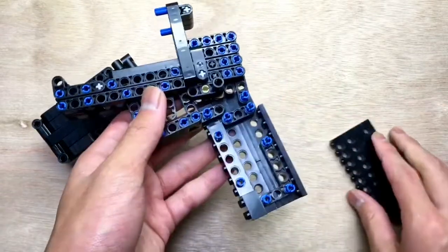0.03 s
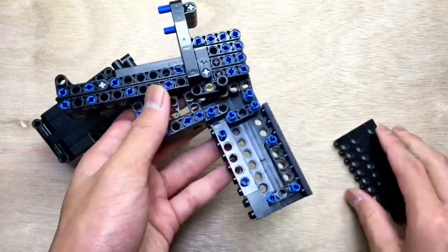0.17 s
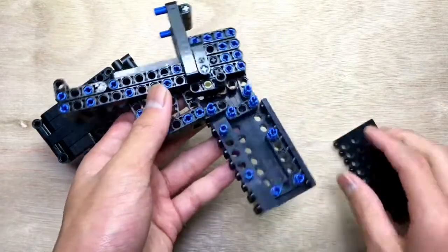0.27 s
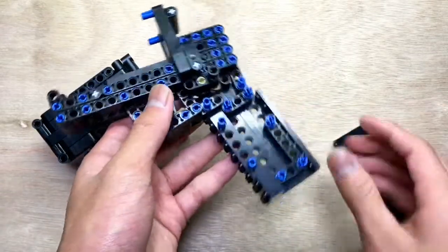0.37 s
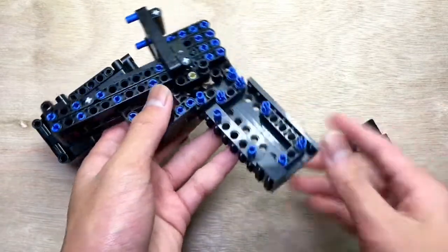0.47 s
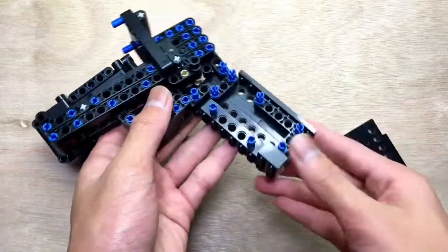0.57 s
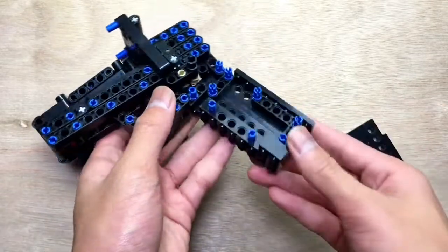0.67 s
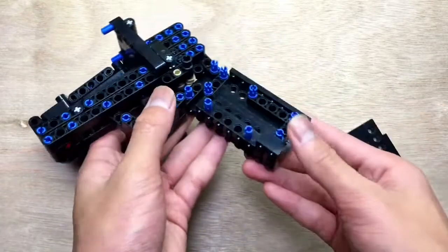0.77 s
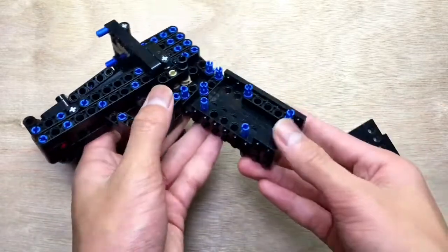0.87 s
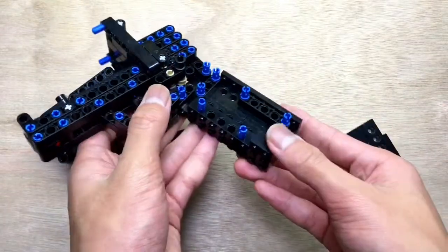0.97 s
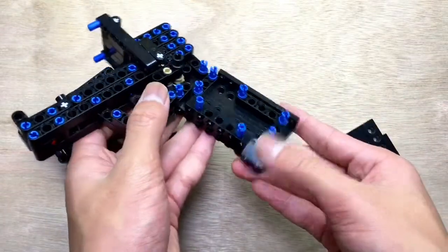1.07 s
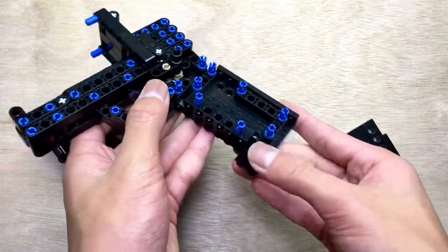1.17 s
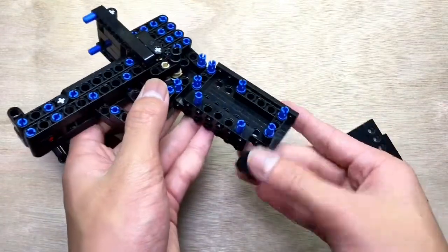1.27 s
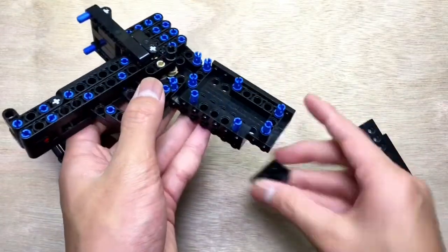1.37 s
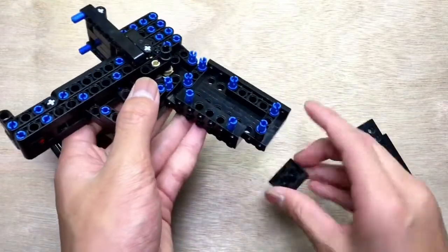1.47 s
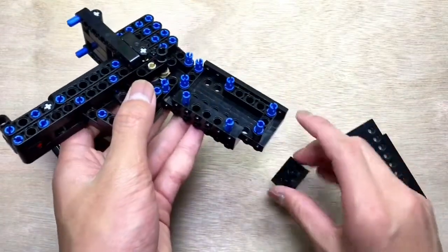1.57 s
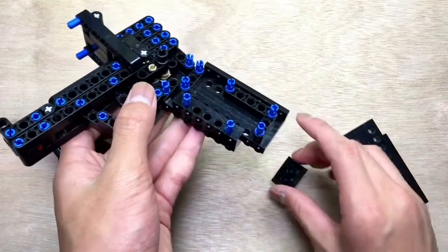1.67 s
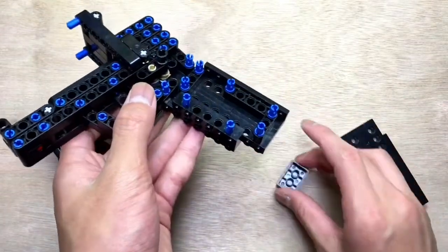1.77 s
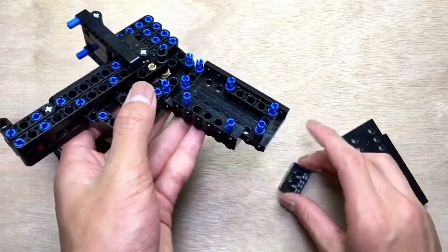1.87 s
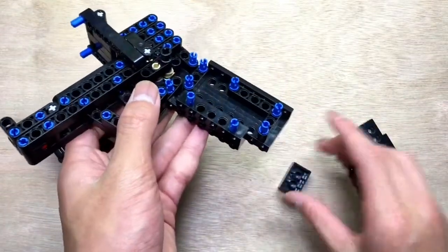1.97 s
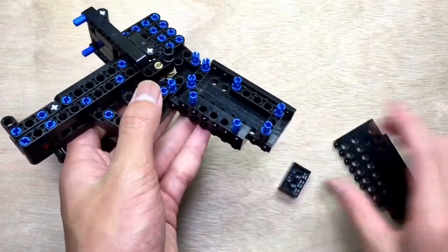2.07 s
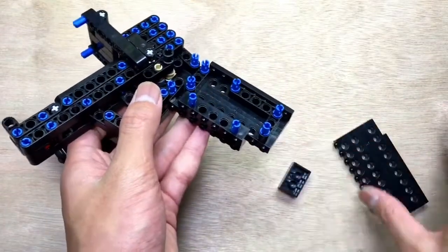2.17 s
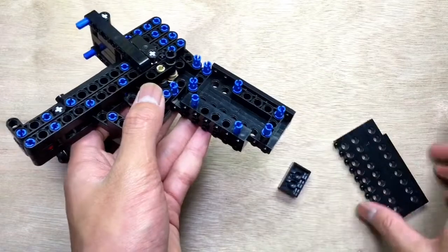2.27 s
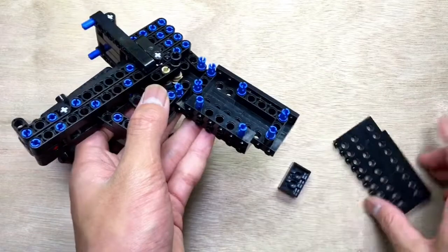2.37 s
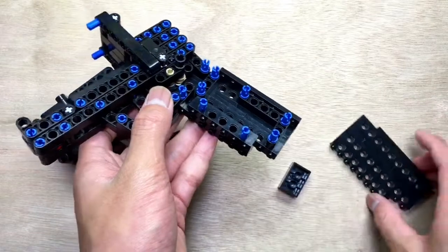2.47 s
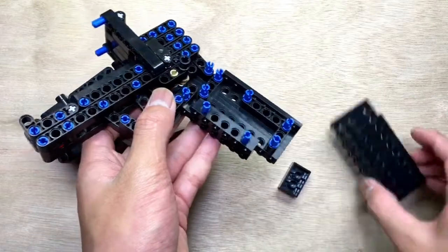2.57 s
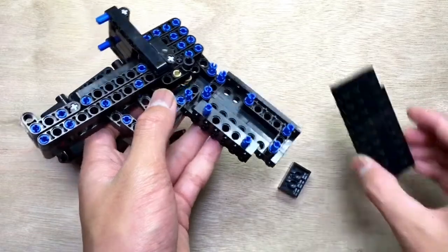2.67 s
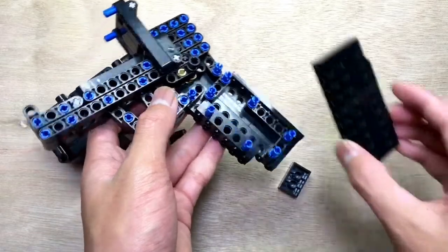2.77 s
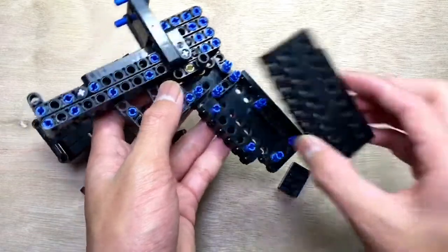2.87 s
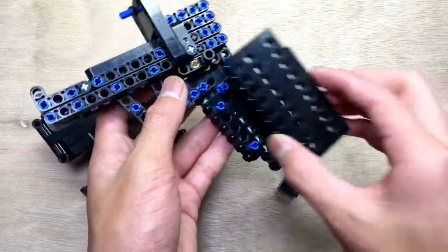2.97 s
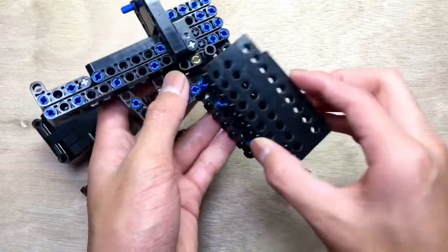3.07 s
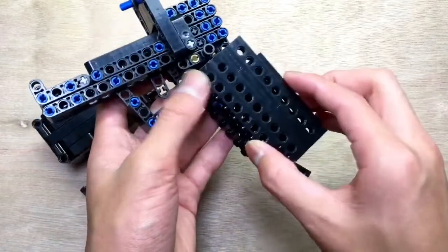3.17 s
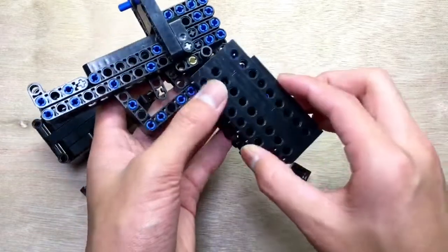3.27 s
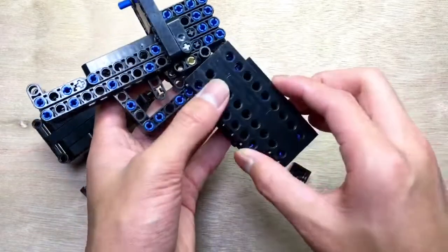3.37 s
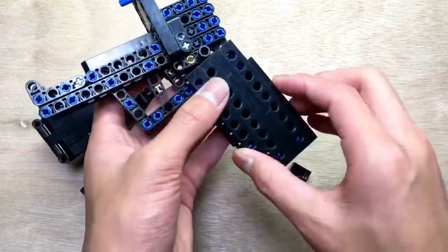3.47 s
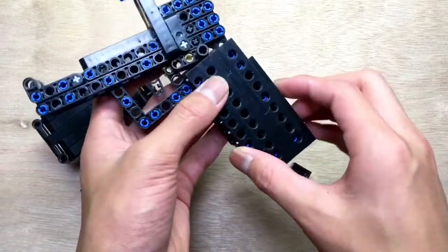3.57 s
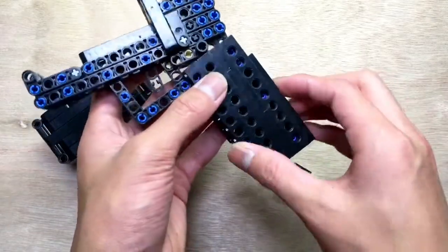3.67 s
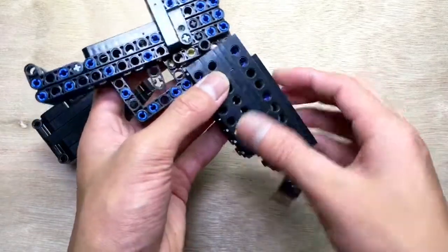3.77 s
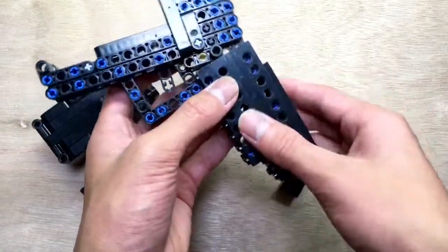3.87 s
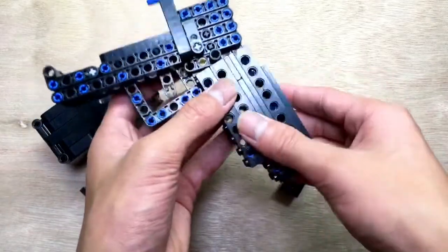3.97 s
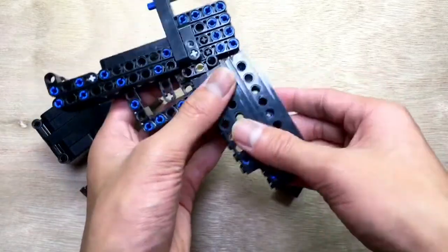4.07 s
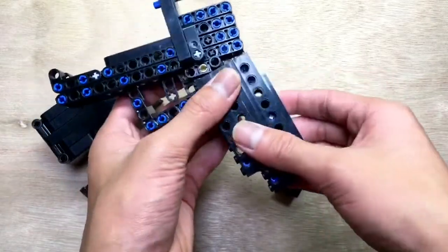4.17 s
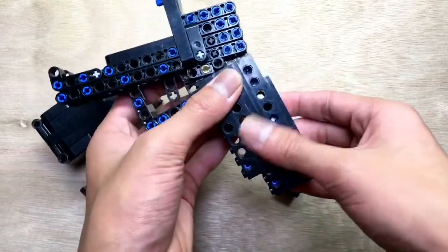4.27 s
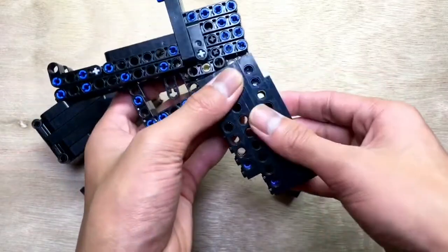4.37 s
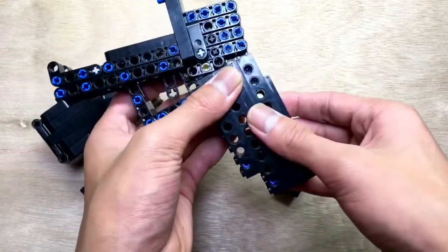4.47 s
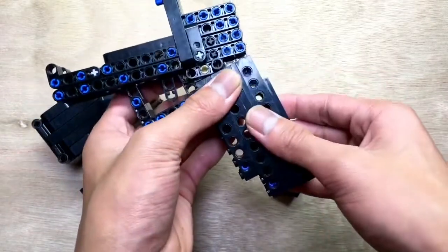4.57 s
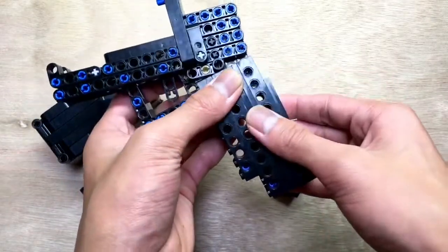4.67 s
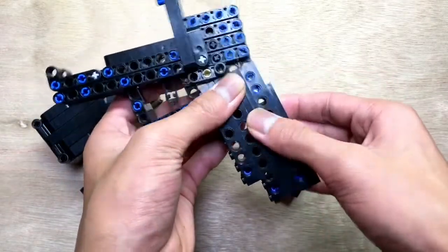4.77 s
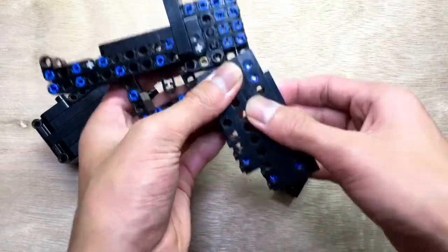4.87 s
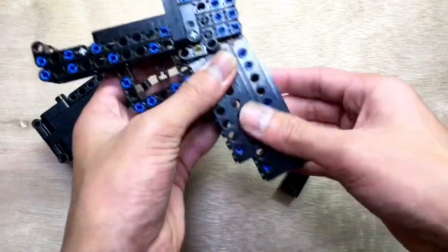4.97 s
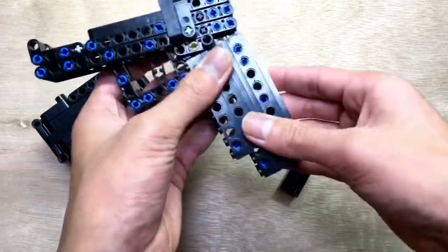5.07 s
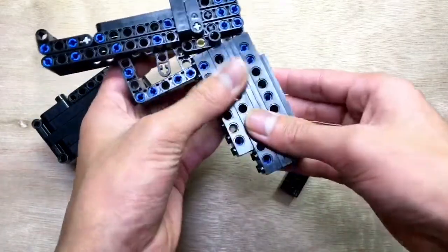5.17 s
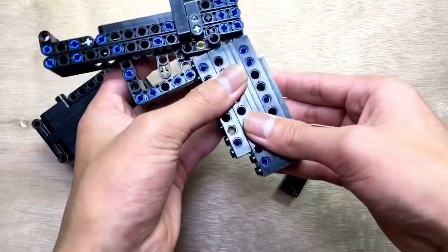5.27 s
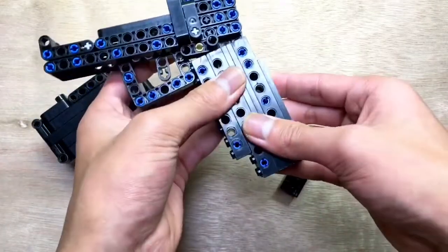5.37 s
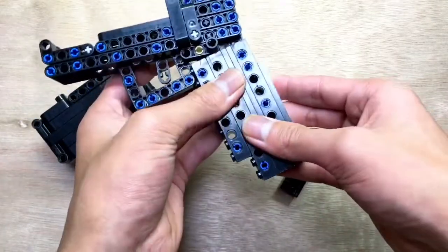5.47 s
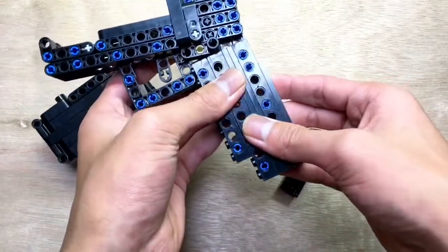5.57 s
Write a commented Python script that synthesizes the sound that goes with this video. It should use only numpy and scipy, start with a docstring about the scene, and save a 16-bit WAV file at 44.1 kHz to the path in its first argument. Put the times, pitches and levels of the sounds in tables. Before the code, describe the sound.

Very close microphone in a small, fairly dry room. A plastic part knocks dully on a wooden table, then a long pause, a faint tick, a brighter tap with small rattles and a short scrape. Later a plate is pressed onto pins, with one clear clack, light ticks and a run of sharp, loud snaps to the end. A faint wavering hum and hiss lie beneath.

```python
"""Plastic building parts snapped together

Plastic beams and pins are handled close to a microphone over a wooden table: decaying modes driven by chatter.
Loose parts are tapped and slid on the wood; then a plate is pressed onto pins, which tick and snap home.
A small room answers with bursts of diffuse noise after clicks and sparse echoes of the tabletop sounds.
Beneath lie a low wavering hum of sines and a hiss of shaped noise."""
import sys
import numpy as np
from scipy import signal
from scipy.io import wavfile
from scipy.ndimage import uniform_filter1d

SR = 44100
rng = np.random.default_rng(int(sys.argv[2]) if len(sys.argv) > 2 else 0)


def file_out(sig):
    """Save sig as 16-bit WAV at sys.argv[1]."""
    # one column per channel
    cols = np.atleast_2d(sig).T
    # limit, then scale
    lim = np.clip(cols, -1, 1)
    pcm = np.round(lim * 32767).astype(np.int16)
    wavfile.write(sys.argv[1], SR, pcm)


N = 247842

# Modes of a loose part lying on the wood. Each row: frequency in Hz, relative level in dB,
# t60 in ms (ring() raises any below 1 ms to 1 ms).
PART_MODES = [(364, 5, 9.7), (715, 0, 16.3), (850, 1, 24), (956, 2.5, 26.4), (1457, 1, 10.2),
              (1644, -0.5, 26), (1783, -4, 50), (1877, -9.5, 120), (2310, 3.5, 6.3), (2696, -7.5, 31),
              (2870, -0.5, 19), (3390, 0.5, 27), (4000, -12.5, 10), (4075, -8, 47), (4550, -4.5, 27),
              (4760, -12, 0.9), (6370, 8, 3), (8900, -32, 0.89), (13000, 4.5, 0.84)]
# Modes of the wooden table top. Each row: frequency in Hz, relative level in dB, t60 in ms.
TABLE_MODES = [(59.6, -14, 164), (92.3, -3, 72), (135, -6, 93), (193.3, -0.5, 58), (258.4, 3, 28.3),
               (340, 8.5, 12.6)]


def amp(db):
    """Amplitude factor for a level in dB."""
    return 10 ** (np.asarray(db) / 20)


def evened(x):
    """Scale to an rms of 1."""
    return x / np.sqrt(np.mean(x ** 2) + 1e-20)


def peaked(x, db):
    """Scale so that the highest peak stands at this level."""
    return amp(db) * x / abs(x).max()


def read(points, hz):
    """Interpolate a curve of (Hz, value) points over log frequency."""
    point_hz, value = np.transpose(points)
    return np.interp(np.log(hz + 1), np.log(point_hz + 1), value)


def add(mix, start_s, sound):
    """Lay a sound into the mix, cut off at the end."""
    part = mix[round(start_s * SR):][:len(sound)]
    part += sound[:len(part)]


def band(x, lo_hz, hi_hz):
    """Band-pass between two frequencies."""
    sos = signal.butter(2, [lo_hz, hi_hz], "bandpass", fs=SR, output="sos")
    return signal.sosfilt(sos, x)


def ring(modes, spread_db=0., detune=0., size=8192):
    """Impulse response of dying modes of alternate sign; the place of contact changes their shares a little."""
    hz, db, t60_ms = np.transpose(modes)[:, :, None]
    pitch_chance, level_chance = rng.standard_normal((2, len(modes), 1))
    t = np.arange(size) / SR
    turns = hz * (1 + detune * pitch_chance) * t
    decay = amp(db + spread_db * level_chance - 60 * 1000 * t / np.maximum(t60_ms, 1))
    sign = (-1) ** np.arange(len(modes))[:, None]
    return (sign * decay * np.sin(2 * np.pi * turns)).sum(0)


def chatter(hold_ms, t60_ms, rise_ms=0.52, uneven_db=3):
    """Uneven micro-impacts: they build up, hold while the parts jam, then die away."""
    ms = np.arange(8192) * 1000 / SR
    grit = rng.standard_normal(len(ms)) * amp(uneven_db * rng.standard_normal(len(ms)))
    rise = np.minimum(ms / rise_ms, 1)
    fall = amp(-60 * np.maximum(ms - hold_ms, 0) / t60_ms)
    return grit * rise * fall


def click(level_db, bright_db, plate_db, t60_ms):
    """Each group of parts chatters and rings, the small ones more in a bright click; diffuse echoes follow."""
    # Heavily damped modes of the held assembly, one group each for plate, beams, pins and edges.
    # Each row of a group: frequency in Hz, relative level in dB, t60 in ms.
    assembly = [
        [(600, -14, 4), (1050, 0, 6), (1420, 0, 5), (1750, 0, 5)],
        [(2300, -1, 4), (2900, 0, 4), (3400, 1, 4), (4000, 0, 3)],
        [(4900, 0, 2.5), (5600, -1, 2), (6300, 0, 2), (7000, 1, 2), (8000, 0, 2)],
        [(9000, -3, 1.5), (9800, -1, 1.5), (10600, -2, 1.5), (12100, 0, 1.5), (13200, 0, 1.5), (14300, 0, 1.5),
         (15400, 1, 1.5), (16400, 1, 1.5)],
    ]
    # What each group radiates and how the room returns it.
    # Each row: lowest frequency in Hz, highest in Hz, echo level in dB, echo t60 in ms.
    groups = [(700, 2460, -23.5, 167), (1757, 4840, -23, 164), (4540, 9200, -23.5, 132),
              (7960, 18680, -30, 148)]
    # How beams, pins and edges share a click.
    # Each row: level in dB, octaves above the middle of the click.
    shares = [(0.7, -0.98), (-1.5, 0.15), (2.2, 0.85)]

    jam_ms = 0.066 * t60_ms  # the parts stay jammed for this share of the chatter's t60
    levels = [level_db + plate_db]
    levels += [level_db + db + bright_db * octaves for db, octaves in shares]
    longer_db = 10 * np.log10(max(jam_ms, .3) + t60_ms / 14)  # longer chatter feeds the room more
    out = 0
    for modes, db, (lo_hz, hi_hz, echo_db, echo_ms) in zip(assembly, levels, groups):
        body = ring(modes, spread_db=2, detune=.03, size=1024)
        body = band(band(body, lo_hz, hi_hz), lo_hz, hi_hz)  # small parts radiate no bass
        grit = chatter(jam_ms, t60_ms, rise_ms=0.3)
        direct = signal.fftconvolve(grit, body)[:len(grit)]
        echoes = chatter(jam_ms, echo_ms, rise_ms=3.8, uneven_db=1)
        echoes = band(band(echoes, lo_hz, hi_hz), lo_hz, hi_hz)
        out = out + peaked(direct, db) + peaked(echoes, db + echo_db + longer_db)
    return out


def thud(db):
    """The table top takes a soft push and booms."""
    boom = ring(TABLE_MODES, spread_db=1)
    push = 1 - np.exp(-np.arange(len(boom)) / SR / 0.002)  # eases in over 2 ms
    return peaked(band(boom * push, 45, 560), db)


def tap(part_db, hardness_hz, thud_db):
    """A blow, duller the softer the contact, and a rattle ring the part; the table top thuds below."""
    blow = amp(-20) * chatter(hold_ms=0, t60_ms=52.5)  # the rattle
    blow[0] = 3.75  # the blow itself
    body = peaked(ring(PART_MODES, spread_db=1.5, detune=.01), 0)
    rung = signal.fftconvolve(blow, body)[:len(blow)]
    rung[:2] += amp(18.5) * np.array([1, -.5])  # the bare contact clacks before the part rings
    b, a = signal.butter(2, hardness_hz, fs=SR)
    soft = signal.lfilter(b, a, rung)
    return peaked(band(soft, 90, 18000), part_db) + thud(thud_db)


def slide(length_s, start_db, end_db):
    """Wood grain shakes the part and the table in uneven catches; skin hisses on top."""
    hiss_db, rumble_db = 2, -2.5  # skin hiss and table rumble, relative to the part
    size = round(length_s * SR)
    drag = amp(np.linspace(start_db, end_db, size)) * signal.windows.tukey(size, .15)
    grain, skin, catches = rng.standard_normal((3, size))
    catches = amp(4 * evened(uniform_filter1d(catches, size=120)))  # uneven by 4 dB rms
    shaken = grain * catches
    part = evened(signal.fftconvolve(shaken, ring(PART_MODES))[:size])
    table = signal.fftconvolve(shaken, ring(TABLE_MODES))[:size]
    table = evened(band(table, 230, 360))
    hiss = evened(band(skin * np.sqrt(catches), 7100, .45 * SR))
    return drag * (part + amp(hiss_db) * hiss + amp(rumble_db) * table)


def rub(length_s, dull_db, fine_db):
    """Soft friction noise, patchy as skin sticks and lets go."""
    size = round(length_s * SR)
    dull, fine, grip = rng.standard_normal((3, size))
    grip = amp(2.2 * evened(uniform_filter1d(grip, 300)))  # patchy by 2.2 dB rms
    swell = signal.windows.tukey(size, .35)
    dull = amp(dull_db) * evened(band(dull, 310, 10700))
    fine = amp(fine_db) * evened(band(fine, 13000, 15000))
    return grip * swell * (dull + fine)


def room(x):
    """Sparse echoes of random sign, each band dying at its own speed."""
    # How fast the small room dies away. Each row: frequency in Hz, t60 in s.
    room_decay = [(300, 0.31), (1000, 0.1), (3000, 0.15), (8000, 0.062), (15000, 0.066)]
    # How strongly it answers. Each row: frequency in Hz, echo energy in dB.
    room_colour = [(300, -11), (1000, -14.5), (3000, -3), (6000, -20), (10000, -33), (15000, -22.5)]

    spacing = 16  # samples, one echo in each stretch
    taps = np.zeros(SR // 2)
    at = np.arange(150, len(taps) - spacing, spacing)
    taps[at + rng.integers(0, spacing, len(at))] = rng.choice([-1., 1.], len(at))
    hz, t, z = signal.stft(taps, SR, nperseg=256)
    t60 = read(room_decay, hz)[:, None]
    fading_db = read(room_colour, hz)[:, None] - 60 * t / t60
    shaped = z * amp(fading_db) / np.sqrt(t60)  # a slower decay gains no energy
    echoes = signal.istft(shaped, SR, nperseg=256)[1]
    echoes = echoes / np.sqrt(SR / spacing / np.log(1e6))  # nor do denser echoes
    return signal.fftconvolve(x, echoes)[:N]


def air_and_hiss():
    """Steady noise of the air and the microphone's hiss, in faint drifting patches."""
    # Spectrum of air and hiss. Each row: frequency in Hz, relative density in dB per Hz.
    floor = [(15, -55), (25, -24), (53, -6.5), (133, -5.5), (145, -4), (157, -15), (325, -19.5), (404, -21),
             (1010, -30), (1400, -29.5), (1880, -32.5), (4720, -33), (5400, -36), (10000, -33.5),
             (15900, -30.5)]
    frames, hz = N // 512 + 5, np.fft.rfftfreq(2048, 1 / SR)
    real, imag, patches = rng.standard_normal((3, len(hz), frames))
    patches = uniform_filter1d(uniform_filter1d(patches, 20, 0), 8, 1)
    gain = amp(read(floor, hz)[:, None] + evened(patches))  # patches of 1 dB rms
    air = signal.istft((real + 1j * imag) * gain, nperseg=2048, noverlap=1536)[1][:N]
    return amp(-59.5) * evened(air)


def hum():
    """Fuzzy machine hum: sines whose pitch wanders and whose level swells at random."""
    # Each row: centre frequency in Hz, width in Hz (twice the rms wander), level in dB rms before swelling.
    hum_tones = [(133.6, 5.23, -61.5), (89, 9.55, -71)]
    out = np.zeros(N)
    for centre_hz, width_hz, db in hum_tones:
        wander, swell = (evened(signal.resample(v, N)) for v in rng.standard_normal((2, 60)))
        turns = np.cumsum(centre_hz + width_hz / 2 * wander) / SR
        out += amp(db + 2 * swell) * np.sqrt(2) * np.sin(2 * np.pi * turns)
    return out


def scene():
    """Handling close to the microphone, taps and slides with the room around them, and the background."""
    # Clicks of the held assembly. Each row: start in seconds, strength in dB,
    # brightness in dB per octave, the plate's part in dB, chatter t60 in ms.
    clicks = [(1.123, -29, 10, -7.5, 19), (1.1366, -46.5, -2, -2, 24), (1.1874, -42, 10, -8, 8.5),
              (3.1223, -34, -2, -1.5, 17), (3.1395, -41.5, -3, 0.5, 33), (3.1785, -51.5, -0.5, -14, 7.4),
              (3.3655, -49.5, -9, 1.5, 15), (3.4063, -48.5, -1, 0, 13), (3.411, -35, -2.5, -2.5, 16),
              (3.507, -39.5, -5.5, -6, 14.4), (3.545, -41.5, -1, -2, 19), (3.5623, -43.5, -6, 1, 16),
              (3.5665, -11, -2.2, -14, 11), (3.6757, -51, -4, -19, 12), (3.691, -50, -1.2, -19, 12),
              (3.723, -62, 9, -17, 11), (3.93, -40.5, -1, -8, 40), (3.9329, -46.5, -3, -0.5, 22),
              (3.9423, -38.5, -0.5, -6.5, 12.5), (4.207, -43.5, 0.5, -9, 10.6), (4.2997, -42, 15, -15, 9.1),
              (4.3351, -26, 9.5, -24.5, 15), (4.3387, -39, 5, -19, 8.6), (4.4005, -55, 2, -9, 12),
              (4.469, -54, 11, -15, 6.4), (4.4943, -33, 9.5, -18.5, 4.8), (4.4986, -41, 12, -15, 17),
              (4.6486, -51, 3.5, -21, 9.9), (4.6764, -33.5, 8, -20, 10), (4.7039, -33.5, 12, -31, 13.4),
              (4.784, -49.5, 2, -11, 20), (4.7948, -38, 11, -11, 17), (4.7999, -18, 7, -10, 8.6),
              (4.8026, -7.5, 3.5, -22, 18), (4.8062, -1.5, 6.5, -14.5, 11.4), (4.8117, -19.5, 2.5, -13, 76),
              (5.14, -39.5, 11.5, -17, 20), (5.2176, -28.5, 1, -12, 4.4), (5.2196, -16.5, 7.5, -25.5, 14.2),
              (5.2936, -19, 4.5, -14, 12.4), (5.351, -16.5, 2, -12.5, 16), (5.3552, -18, 2, -8.5, 12),
              (5.4525, -55, 9, -13, 9.9), (5.469, -15.5, 3, -10.5, 9.5), (5.4722, -7, 10, -12, 10.2),
              (5.54, -40, 5, -10, 9), (5.5508, -34, 0, -14, 25), (5.5588, -1.3, 3.5, -16.5, 21.4)]
    # Jolts that the hardest snaps pass through the hands into the table.
    # Each row: start in seconds, peak level in dB.
    jolts = [(1.122, -52.5), (3.123, -57), (3.57, -45), (4.803, -26), (5.219, -43), (5.352, -35),
             (5.473, -38.5), (5.563, -41.5)]
    # Fingers creeping over plastic, each a soft swell. Each row: start in seconds, length in seconds,
    # dull rub in dB rms, fine rub in dB rms, both before the patchy grip and the swell.
    rubs = [(0.832, 0.061, -84, -66), (0.946, 0.09, -72, -69), (3.677, 0.034, -69, -57),
            (3.71, 0.078, -71, -60.5), (4.862, 0.17, -60.5, -67), (4.992, 0.2, -58.5, -66)]
    # Loose parts knocked on the table. Each row: start in seconds, the part's peak in dB,
    # hardness as a low-pass corner in Hz, the thud's peak in dB.
    knocks = [(0.1878, -18, 1770, -39), (1.7857, -22, 9100, -75), (1.828, -39.5, 3970, -56),
              (1.857, -38.5, 2210, -60), (1.899, -50, 900, -53), (1.9646, -39.5, 1010, -64),
              (1.98, -45, 2000, -54), (2.337, -38.5, 1300, -32), (2.36, -38.5, 1300, -29.5),
              (2.383, -45, 3500, -48.5)]
    # Parts dragged over the wood. Each row: start in seconds, length in seconds,
    # the part's level in dB at the start, at the end in dB, before the fades.
    slides = [(0.0, 0.15, -59, -64.5), (2.373, 0.048, -56, -59.5), (2.416, 0.056, -51, -48.5),
              (2.462, 0.129, -62.5, -66.5)]

    hands, table = np.zeros((2, N))
    for start_s, *row in clicks:
        add(hands, start_s, click(*row))
    for start_s, db in jolts:
        add(hands, start_s, thud(db))
    for start_s, *row in rubs:
        add(hands, start_s, rub(*row))
    for start_s, *row in knocks:
        add(table, start_s, tap(*row))
    for start_s, *row in slides:
        add(table, start_s, slide(*row))
    return (hands + table + room(table) + air_and_hiss() + hum())[None]


def record(dry):
    """Peaks are clipped at full scale; the top treble drops a step before the band limit."""
    edge_hz = 16400  # band limit
    hz = [0, 15700, 15900, edge_hz, edge_hz + 150, SR / 2]
    gain = [1, 1, .1, .08, 0, 0]
    taps = signal.firwin2(1023, hz, gain, window=("kaiser", 8), fs=SR)
    limited = signal.oaconvolve(np.clip(dry, -1, 1), taps[None], "same")
    return np.clip(limited, -1, 1)


dry = scene()
out = record(dry)
file_out(out)
```